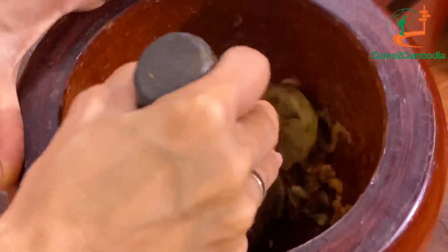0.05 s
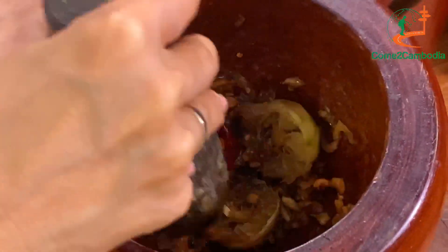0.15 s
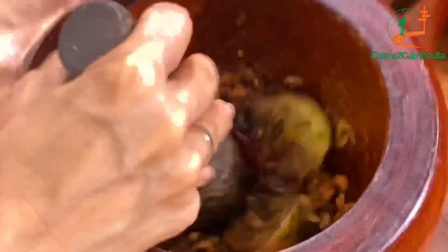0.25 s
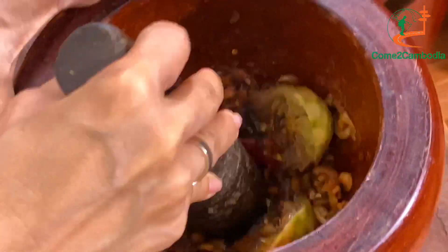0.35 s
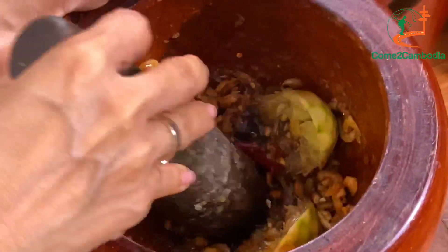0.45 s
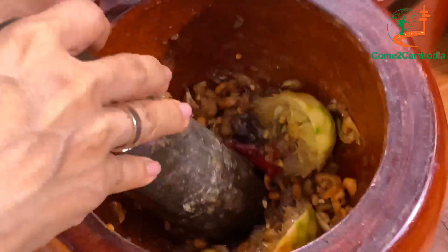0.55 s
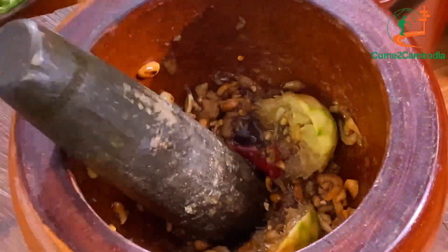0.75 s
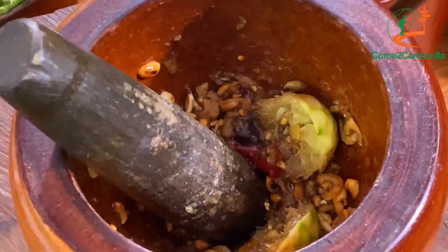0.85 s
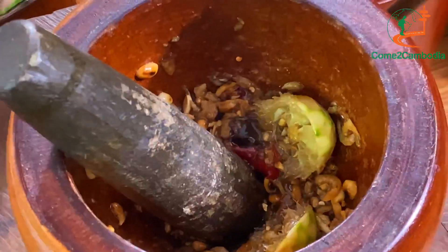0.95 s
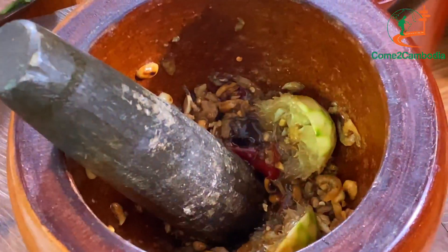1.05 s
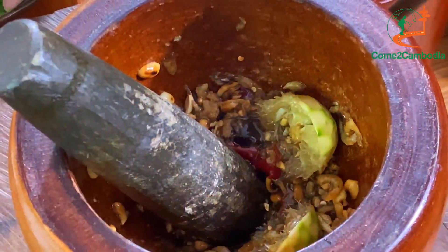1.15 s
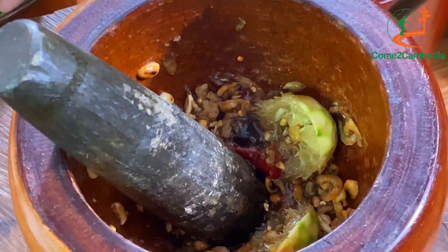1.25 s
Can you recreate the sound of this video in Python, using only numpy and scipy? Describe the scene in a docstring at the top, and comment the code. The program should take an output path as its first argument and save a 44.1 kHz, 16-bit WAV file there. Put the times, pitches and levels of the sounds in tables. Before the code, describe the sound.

Close up, a pestle thuds twice into wet spices in a clay mortar with a slight crackle, then hits the side with a hollow knock. A soft rustle follows over a faint appliance hum in a small kitchen.

```python
"""A dull ring dies away with a wet squelch, then a pestle pounds again into moist spices in a clay mortar.
It knocks against the wall and is left leaning on the rim. Each impact excites short damped modes of the
bowl, the low ones last, and a burst of contact noise; the crushed paste crackles and pops.
A small kitchen reverberates, an appliance hums faintly, and a soft rustle and a low bump come at the end."""
import sys
import numpy as np
from scipy import signal
from scipy.fft import rfft, irfft
from scipy.io import wavfile
from scipy.ndimage import uniform_filter1d

SR = 44100
rng = np.random.default_rng(int(sys.argv[2]) if len(sys.argv) > 2 else 0)


def store_wav(level_fs):
    """Save 16-bit WAV to argv[1]."""
    pcm = np.round(np.clip(np.atleast_2d(level_fs), -1, 1) * 32767)
    wavfile.write(sys.argv[1], SR, pcm.T.astype(np.int16))


N = 57330
M = N + int(.1 * SR)  # with an unheard lead-in, where the first blow lands
T = np.arange(M) / SR - .1

# blows into the paste: start_s, level_db, press_s, treble_db
PASTE_BLOWS = [(-.04, -2.5, 0.12, -9), (0.2359, 0, .048, -0.5)]
# the wall is struck, later the leaning pestle shifts: start_s, level_db
CLAY_KNOCKS = [(0.5057, -1), (1.17, -42)]
# modes of mortar and pestle: pitch_hz, decay_s, delay_s, through_paste_db, on_wall_db
MORTAR_MODES = [(88.5, 0.059, 0.0051, -27, -54), (205.6, 0.05, 0.00434, -17.5, -17.5),
                (249.7, 0.039, 0.00401, -21.5, -15.5), (404.5, 0.039, .004, -24, -24),
                (572, 0.03, 0.003965, -9, -6.5), (697, 0.052, 0.002906, -15.5, -23),
                (913.2, 0.033, 0.00016, -4, -15), (1161.7, 0.021, 0.00019, -10.5, -13.5),
                (1399, 0.024, 0.00012, -17, -30.5), (1739, 0.02, 0.00016, -10.5, -28.5),
                (1840, .016, 0.00013, -15.5, -27), (2128, 0.015, 0.000071, -37, -16.5),
                (2628, 0.03, 0.000068, -29, -45), (3248, 0.018, 0.000067, -54.5, -22),
                (3380, 0.016, 0.000097, -48.5, -27), (4244, 0.011, 0.000062, -37, -28)]
# contact noise through the paste: frequency_hz, density_db
PASTE_CONTACT = [(60, -30.5), (300, -17), (700, -17), (1300, 4), (2200, 0.5), (3300, -15.5), (5200, -14.5),
                 (8500, -24), (12000, -35), (15500, -26)]
# contact noise on bare clay: frequency_hz, density_db
WALL_CONTACT = [(60, -24.5), (300, -25), (750, -1), (1300, 11), (2200, 4), (2700, -19), (3500, 4.5),
                (5200, -20), (8500, -22), (12000, -31), (15500, -43)]
# wet crackle of the paste: frequency_hz, density_db
SQUELCH_SPECTRUM = [(1000, -27), (3000, 9), (5300, -0.5), (7000, -9), (9000, -3), (12000, -13.5),
                    (15500, -27)]
# bits of spice popping: start_s, level_db, pitch_hz
SPICE_POPS = [(.05, -40.5, 4440), (.072, -46.5, 6000), (.083, -39, 3510), (0.2486, -43, 8800),
              (.255, -55, 9500), (0.275, -48, 5700), (0.2792, -36, 5500), (.34, -48.5, 5000),
              (0.464, -54.5, 6800), (.752, -55, 7700), (.815, -60.5, 13000), (1.16, -60, 4500),
              (1.177, -64, 8040), (1.214, -57, 6000)]
# kitchen reverberation: frequency_hz, t60_s, level_db
REVERB_BANDS = [(70, .5, -14.5), (150, 0.26, -8), (280, .4, -7.5), (400, .4, -3), (560, 0.37, -10),
                (910, 0.39, -12.5), (1272, 0.4, -3.5), (1700, 0.41, -10), (2240, 0.34, -6.5),
                (3270, .32, -10), (6000, 0.46, -8.5), (14100, 0.2, -7.5)]
# lingering kitchen resonances: pitch_hz, t60_s, gain_db
KITCHEN_MODES = [(76.2, 0.65, 6), (270.7, 0.47, 3.5), (516, 0.39, 1), (577.6, 0.51, -6), (950, 0.35, -14.5),
                 (1214, 0.13, 1.5), (1610, .5, -11.5)]
# stereo width of diffuse sound: frequency_hz, side_db
SIDE_GAINS = [(60, -28.5), (200, -12.5), (380, -10), (700, -5), (2400, -0.5), (4400, -29), (15000, 4)]
# appliance hum and whine: pitch_hz, width_hz, level_db
HUM_BANDS = [(106.3, 2.2, -60), (2216, 7.2, -70), (3284, 110, -69.5)]
# soft rustle: frequency_hz, density_db
RUSTLE_SPECTRUM = [(200, -13), (550, -2), (1300, 7), (1800, -19), (4200, -13), (8000, -24), (15000, -21)]
# room air: frequency_hz, density_db
AIR_SPECTRUM = [(15, -36.5), (25, -6), (59, -12.5), (107, 0.5), (140, -6.5), (204, -13.5), (240, -8.5),
                (313, -16), (389, -14.5), (509, -18.5), (598, -20.5), (1050, -19.5), (1530, -28),
                (2300, -24), (3260, -29), (4500, -40), (15500, -52)]


def bowl(start, mode_levels_db, choke=1.528):
    """Modal superposition: each mode swells, then decays ever faster as the pestle presses on."""
    out = np.zeros(M)
    for (hz, decay_s, delay_s, *_), db in zip(MORTAR_MODES, mode_levels_db):
        age = T - start - delay_s
        swell_s = min(.99 / hz, .0015)  # about one cycle, less for the low modes
        swell = np.sin(np.pi / 2 * np.clip(age / swell_s, 0, 1)) ** 2
        damping = (np.maximum(age - swell_s, 0) / decay_s) ** choke
        out += undb(db) * swell * fade(damping, .89) * np.sin(2 * np.pi * hz * age)
    return out


def contact(start, spectrum, t60_s, rise_s=.0012):
    """Impact noise: the brief meeting of two surfaces radiates a broadband burst."""
    age = T - start
    return noise(spectrum) * np.clip(age / rise_s, 0, 1) * fade(np.maximum(age - rise_s, 0), t60_s)


def pound(start, treble_db, cushion_hz=1500):
    """Cushioned impact: thick paste weakens the upper modes, so the ring is dull."""
    levels_db = [db + treble_db * (hz > cushion_hz) for hz, _, _, db, _ in MORTAR_MODES]
    return bowl(start, levels_db) + undb(-18.5) * contact(start, PASTE_CONTACT, t60_s=.022)


def wall_knock(start):
    """Hard impact: bare clay gives a hollow note with a bright tick."""
    levels_db = [on_wall_db for *_, on_wall_db in MORTAR_MODES]
    return bowl(start, levels_db) + undb(-23.5) * contact(start, WALL_CONTACT, t60_s=.033)


def paste(quick_press_s=.055, release_s=.004):
    """Compression noise: paste squelches, more softly in a longer press, and bits of spice pop."""
    out = np.zeros(M)
    for start, db, press_s, _ in PASTE_BLOWS:
        grains = np.exp(.55 * unit(uniform_filter1d(rng.standard_normal(M), size=40)))
        press = (T > start) * (1 - np.tanh((T - start - press_s) / release_s)) / 2
        gain = undb(db - 46) * quick_press_s / press_s
        out += gain * press * unit(grains * noise(SQUELCH_SPECTRUM))
    for start, db, hz in SPICE_POPS:
        out += undb(db) * band(hz, width_hz=.3 * hz) * fade(T - start, t60=.007)
    return out


def slide():
    """Friction: the pestle slides through the paste and settles."""
    return hump(peak_s=.565, decay_s=.042, db=-56) * noise(SQUELCH_SPECTRUM)


def reflection(x, delay_s=.0049, level_db=-16.5, above_hz=220):
    """Early reflection: a nearby surface's echo, opposite left and right, widens the sound."""
    bright = signal.sosfilt(signal.butter(2, above_hz, "high", fs=SR, output="sos"), x)
    side = undb(level_db) * np.interp(T - delay_s, T, bright)
    return np.array([side, -side])


def kitchen(x, delay_s=.007, build_s=.0028):
    """Reverberation: convolution with a diffuse tail and a few lingering room modes."""
    age = T - T[0] - delay_s
    build = np.clip(age / build_s, 0, 1)
    hiss, tail = rfft(rng.standard_normal((2, M))), np.zeros((2, M))
    for k, (_, t60, db) in enumerate(REVERB_BANDS):
        share = across([(row[0], j == k) for j, row in enumerate(REVERB_BANDS)])
        envelope = build * fade(age, t60)
        tail += undb(db) * irfft(hiss * share, M) * envelope / np.sqrt(np.sum(envelope ** 2))
    response = spread(*tail)
    for hz, t60, db in KITCHEN_MODES:
        envelope = build * fade(age, t60)
        response += undb(db) * 2 * envelope / envelope.sum() * np.sin(2 * np.pi * hz * age)
    return signal.fftconvolve(response, x[None], axes=1)[:, :M]


def background():
    """Filtered noise: broad for room air and a rustle, narrow for the appliance and a low bump."""
    air = undb(-51) * spread(noise(AIR_SPECTRUM), noise(AIR_SPECTRUM))
    hum = sum(undb(db) * band(hz, width_hz) for hz, width_hz, db in HUM_BANDS)
    rustle = spread(noise(RUSTLE_SPECTRUM), noise(RUSTLE_SPECTRUM))
    rustle *= hump(peak_s=1.178, decay_s=.048, db=-55)
    bump = hump(peak_s=1.297, decay_s=.014, db=-47) * band(hz=143, width_hz=51)
    return air + hum + rustle + bump


def undb(db):
    """Amplitude ratio from decibels."""
    return 10 ** (np.asarray(db) / 20)


def unit(x):
    """Normalisation to rms 1."""
    return x / np.std(x)


def across(points):
    """Log-frequency interpolation of (frequency_hz, value) points, one value per bin."""
    hz, value = np.array(points, float).T
    return np.interp(np.log(np.fft.rfftfreq(M, 1 / SR) + 1), np.log(hz), value)


def noise(spectrum):
    """Spectral shaping of white noise."""
    return unit(irfft(rfft(rng.standard_normal(M)) * undb(across(spectrum)), M))


def band(hz, width_hz):
    """Resonance driven by noise."""
    detuning = (np.fft.rfftfreq(M, 1 / SR) - hz) / width_hz
    return unit(irfft(rfft(rng.standard_normal(M)) / (1 + (2 * detuning) ** 2), M))


def fade(age, t60):
    """Exponential decay from age 0."""
    return (age >= 0) * np.exp(-np.log(1000) * np.maximum(age, 0) / t60)


def hump(peak_s, decay_s, db):
    """Exponential rise and fall around a peak."""
    return undb(db) * np.exp(-abs(T - peak_s) / decay_s)


def spread(mid, side):
    """Decorrelation: two unrelated signals give width; the bass stays central."""
    side = irfft(rfft(side) * undb(across(SIDE_GAINS)), M)
    return np.array([mid + side, mid - side])


def pan(x, left_db):
    """Level difference between left and right places a source."""
    return x * undb(np.array([[left_db], [-left_db]]) / 2)


def scene():
    """Superposition of the mortar, close and slightly left, its echoes and the background."""
    pounding = sum(undb(db) * pound(at, treble_db) for at, db, _, treble_db in PASTE_BLOWS) + paste()
    resting = sum(undb(db) * wall_knock(at) for at, db in CLAY_KNOCKS) + slide()
    source = pounding + resting
    near = pan(pounding, left_db=.3) + pan(resting, left_db=1.5) + reflection(source)
    return (near + kitchen(source) + background())[:, -N:]


def record(dry, top_hz=16000):
    """Soft saturation rounds peaks near full scale; a low-pass cuts the top."""
    rounded = dry / (1 + dry ** 6) ** (1 / 6)
    return signal.sosfilt(signal.ellip(8, .2, 70, top_hz, fs=SR, output="sos"), rounded)


dry = scene()
out = record(dry)
store_wav(out)
```